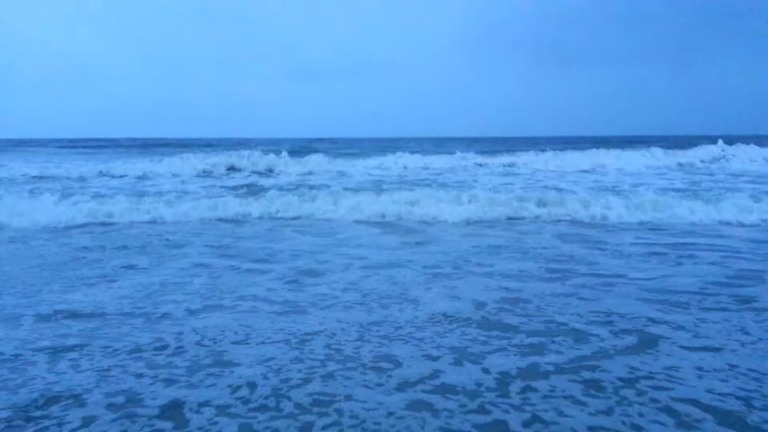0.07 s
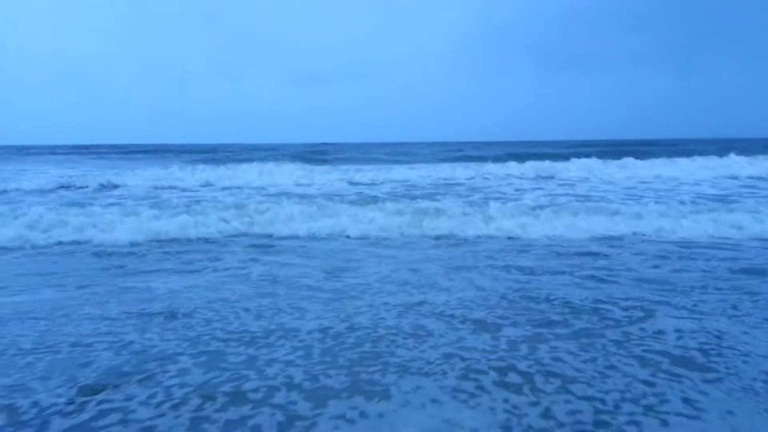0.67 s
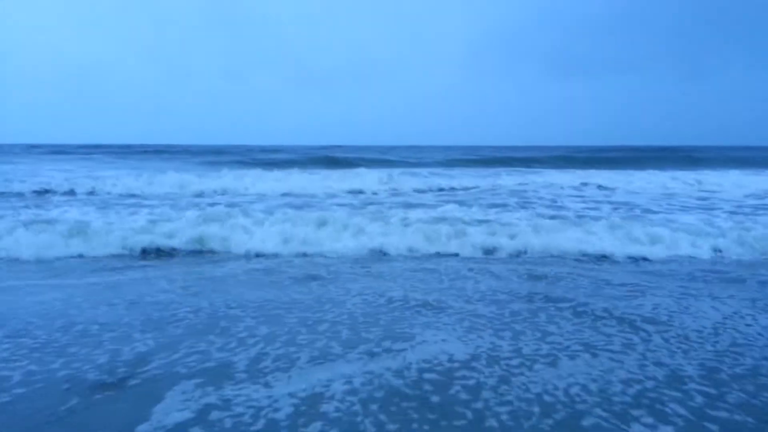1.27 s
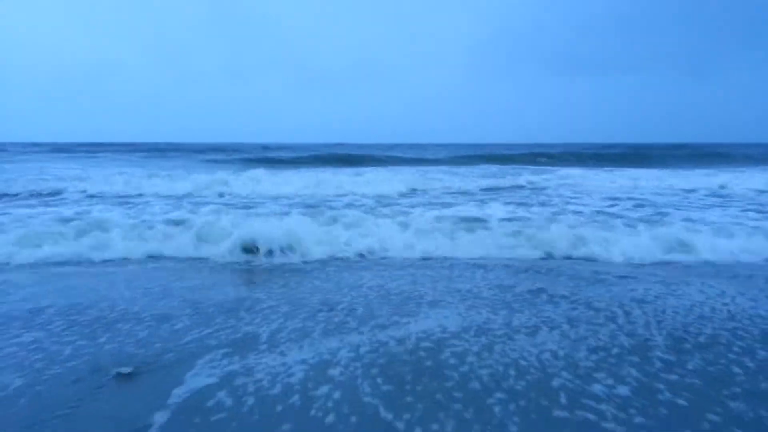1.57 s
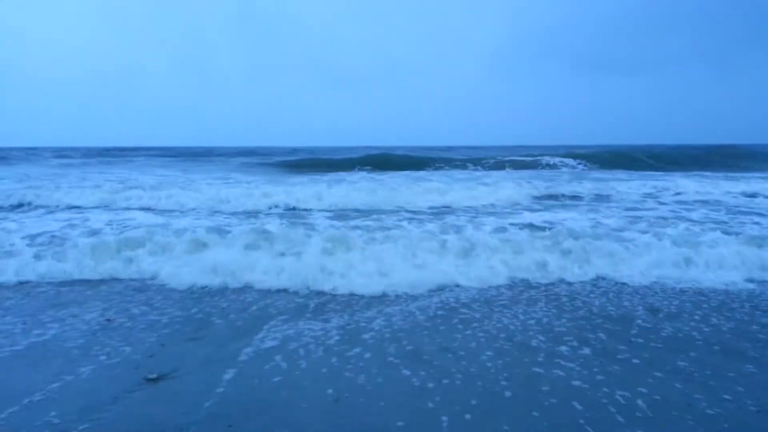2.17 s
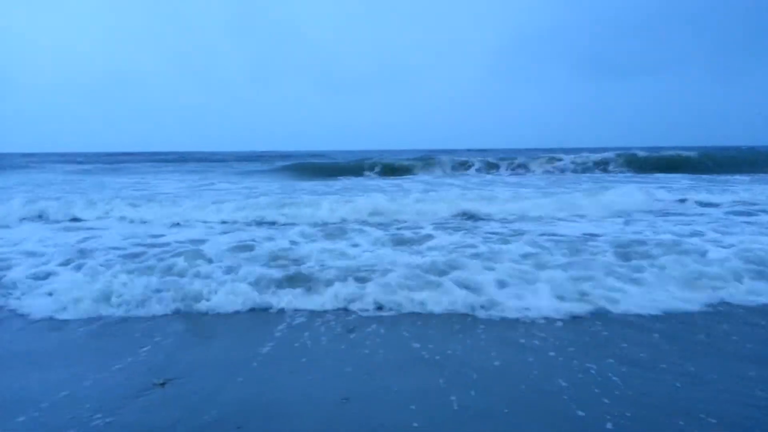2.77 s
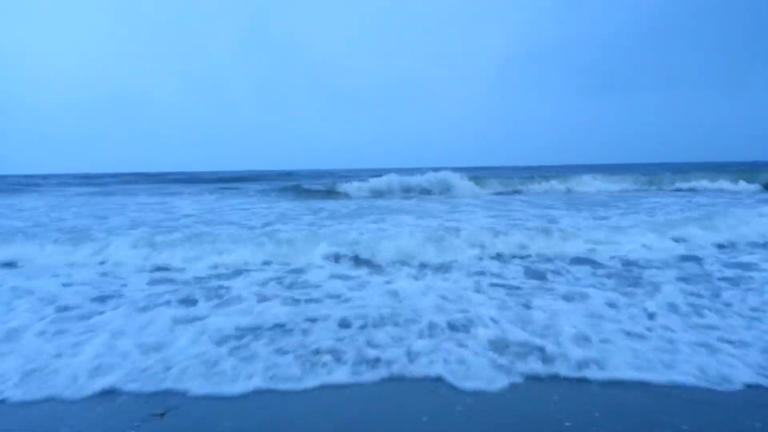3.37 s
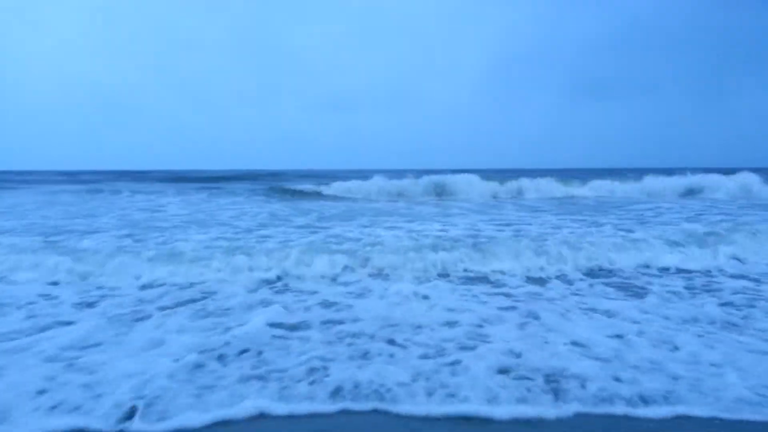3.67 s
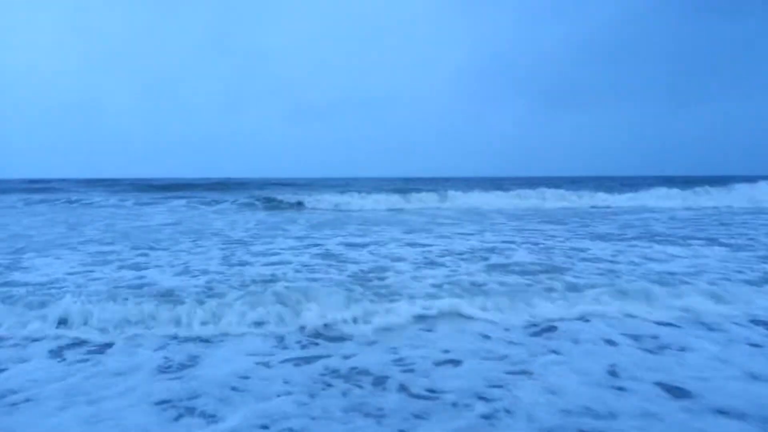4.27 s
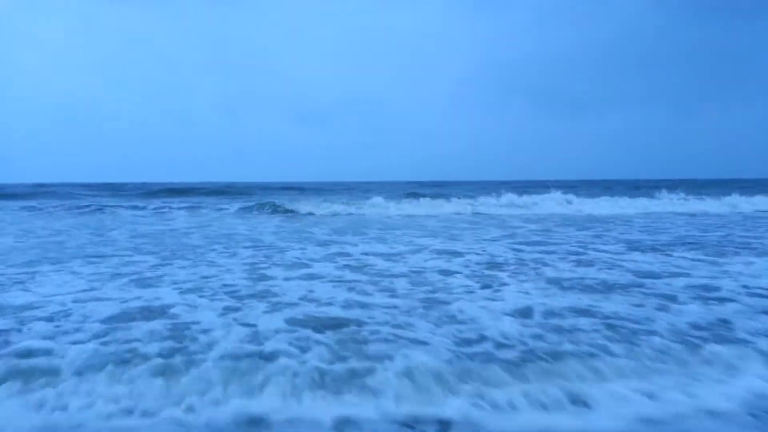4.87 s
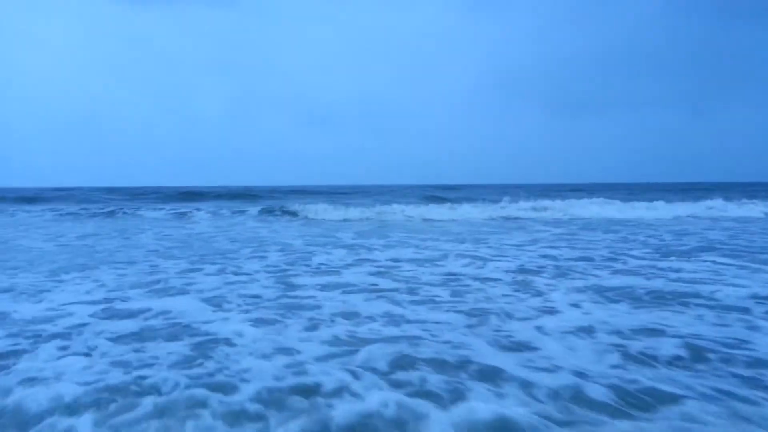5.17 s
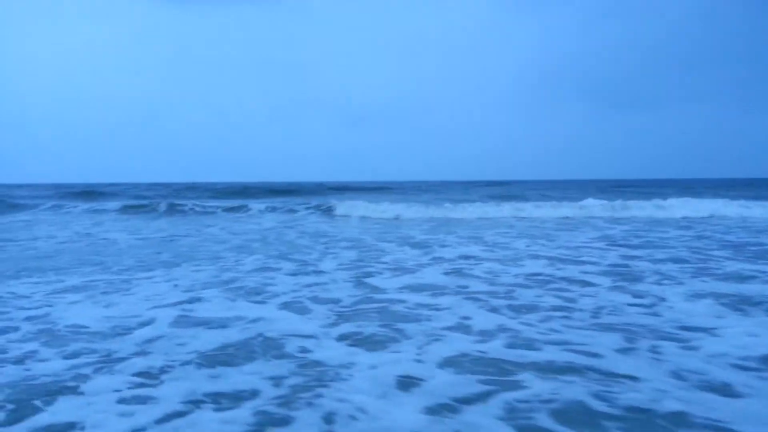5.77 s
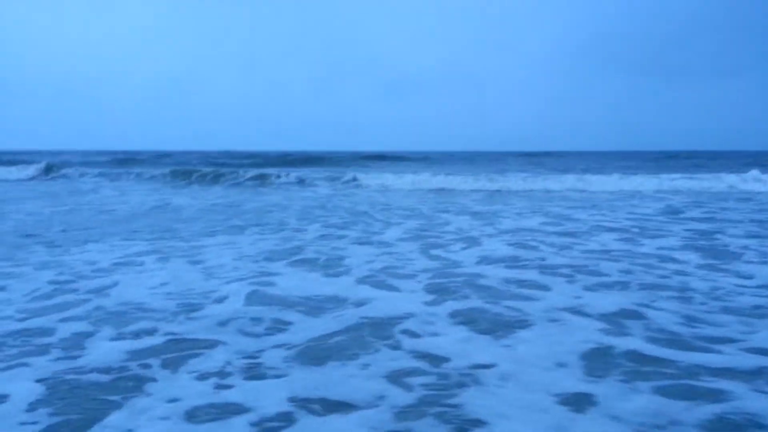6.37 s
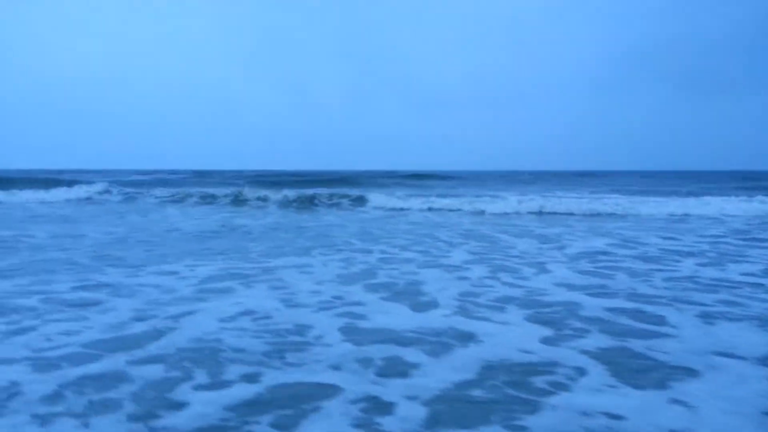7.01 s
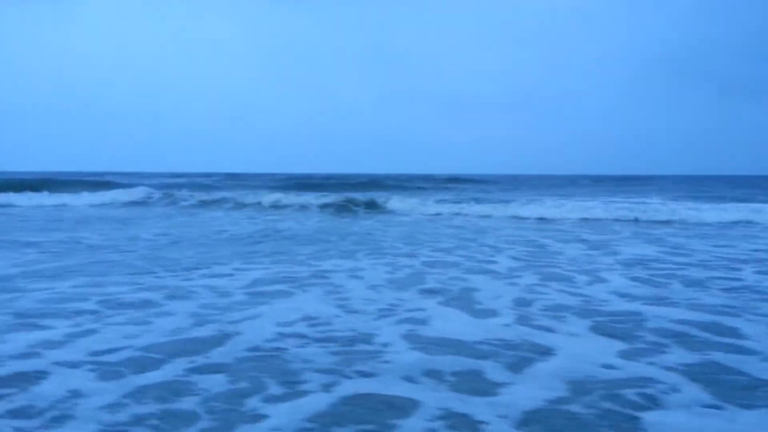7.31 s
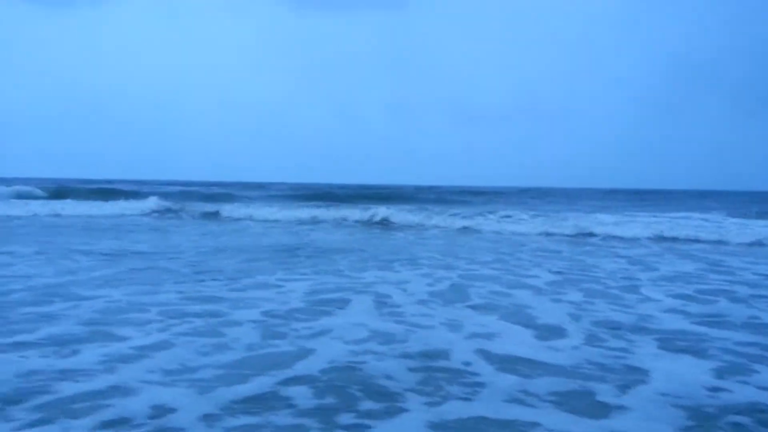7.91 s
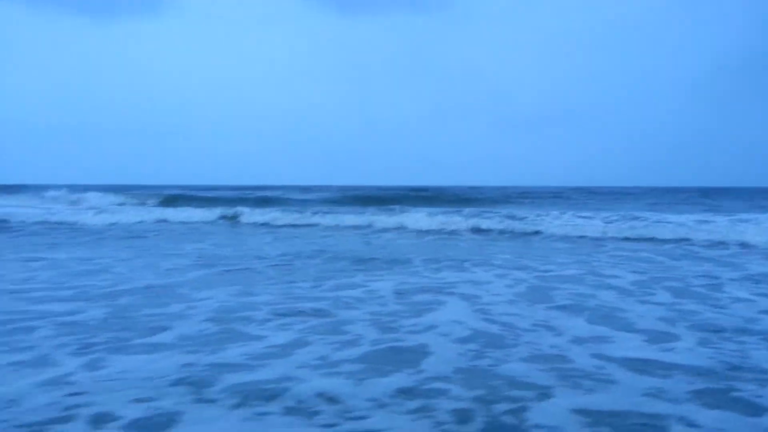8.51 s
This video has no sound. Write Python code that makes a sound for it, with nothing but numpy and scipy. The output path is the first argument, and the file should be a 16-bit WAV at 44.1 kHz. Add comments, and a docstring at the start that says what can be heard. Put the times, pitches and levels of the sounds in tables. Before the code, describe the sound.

At the water's edge on a sandy beach, surf cuts in with a deep roar and a rush of spray. The near wave peaks and dies away into fizzing foam, and gusts of wind start buffeting the microphone with low rumbles and thumps. Water bubbles, splashes and slaps lightly nearby over the steady roll of distant waves, until another breaker begins to spill over.

```python
"""The sound cuts in on a broken wave already roaring; it builds, collapses and slides up the sand.
Large bubble clouds oscillate to make the roar; small bubbles and spray make the rush and the fizz.
Splashes land close by, and turbulent gusts buffet the two ports of a microphone at the water's edge,
mostly the right one. More surf rolls behind, and near the end the next breaker swells."""
import sys
import numpy as np
from scipy import signal
from scipy.fft import rfft, irfft
from scipy.io import wavfile
from scipy.ndimage import uniform_filter1d

SR = 44100
rng = np.random.default_rng(int(sys.argv[2]) if len(sys.argv) > 2 else 0)


def dump(signal):
    """Clip the signal to [-1, 1] and save it as 16-bit WAV at the path in sys.argv[1]."""
    limited = np.clip(np.atleast_2d(signal).T, -1, 1)
    pcm = np.round(limited * 32767).astype(np.int16)
    wavfile.write(sys.argv[1], SR, pcm)


N = 381465
TIME = np.arange(N) / SR


def breakers():
    """Collective oscillation: bubble clouds roar, near and far, while spilling crests rush and spray."""
    # spectra of the close boom, its hollow roar, the far surf and the crests: f/Hz, relative level/dB
    boom_spectrum = [(60, -40), (130, -7), (260, 2), (320, -0.5), (420, -3.5), (700, -38)]
    bore_spectrum = [(100, -31), (280, -9), (385, -12), (480, 3.5), (590, 2.5), (780, -7), (960, 0.3),
                     (1300, -11.5), (2500, -30), (6000, -70)]
    far_spectrum = [(20, -38), (42, -43), (65, -21.5), (150, -2), (260, 0.3), (320, 3), (385, -3), (480, 1),
                    (590, 1.5), (780, -5), (960, -4), (1300, -10.5), (2500, -33), (6000, -68)]
    rush_spectrum = [(150, -40), (500, -7), (950, -4.5), (1400, 1.5), (1950, 1.5), (2400, -3), (3000, -9),
                     (3700, -11.5), (5000, -21), (6500, -31), (10000, -35), (16000, -60)]
    # surf further out: t/s, relative roar level/dB, relative rush level/dB
    far_levels = [(.8, -28, -29), (3.2, -27, -31), (4.4, -26.5, -31), (5.3, -28, -33), (6.2, -27, -34.5),
                  (7.0, -26, -32), (8.65, -28, -31)]
    far_roar, far_rush = amp(curves(far_levels))
    close_boom = close_wave(level_db=-29, build_db_per_s=0.5, collapse_s=1.95, dying_s=0.45)
    close_roar = close_wave(level_db=-23, build_db_per_s=3.2, collapse_s=2, dying_s=0.25)
    close_rush = close_wave(level_db=-22.5, build_db_per_s=5, collapse_s=2.26, dying_s=0.5)
    boom = bubble_noise(boom_spectrum, patch_db=2.0, frames=10, bins=5) * close_boom
    bore = bubble_noise(bore_spectrum, patch_db=1.4, frames=14, bins=4) * close_roar
    far = bubble_noise(far_spectrum, patch_db=1.0, frames=10, bins=5) * far_roar
    roar = (boom + bore + far) * amp(3.5 + 0.62 * flutter(rate_hz=30))
    rush = bubble_noise(rush_spectrum, patch_db=0.67, frames=9, bins=10)
    rush *= amp(0.5 * flutter(rate_hz=2.4))
    spray = droplets(per_s=900, spread_db=4.0, low_hz=1180, high_hz=3900, cycles=3.2)
    spray *= amp(-18.5) * amp([[-3], [2]])  # louder on the right
    crest = (rush + spray) * np.hypot(close_rush, far_rush) * amp(3.5)
    # distance takes the treble off the crests
    close_share = close_rush ** 2 / (close_rush ** 2 + far_rush ** 2)
    treble = signal.sosfiltfilt(signal.butter(2, 2900, "high", fs=SR, output="sos"), crest)
    return roar + crest + treble * (amp(-1.44 + 2.0 * close_share) - 1)


def close_wave(level_db, build_db_per_s, collapse_s, dying_s, tumble_s=1.9):
    """Amplitude envelope: the wave builds as it runs in, holds as it tumbles, then collapses."""
    # a surge each time the front topples: t/s, rise/dB, half length/s
    surges = [(1.2, 1, 0.054), (1.67, 1.5, 0.067), (2.3, 0.6, 0.072), (3.052, 2.2, 0.087)]
    surge_db = sum(rise_db * bell((TIME - s) / half_s) for s, rise_db, half_s in surges)
    build = amp(level_db + surge_db - build_db_per_s * np.maximum(tumble_s - TIME, 0))
    return build * bell(np.maximum(TIME - collapse_s, 0) / dying_s)


def foam():
    """Small bubbles resonate high: foam hisses and prickles, drifting from right to left up the sand."""
    # spectrum of the fizz: f/Hz, relative level/dB
    spectrum = [(1500, -11), (4000, 7.5), (5500, 1.3), (6600, -0.5), (8200, 0.5), (10500, -1.5),
                (13000, -3), (14600, -9.5)]
    # foam sheet around the microphone: t/s, relative level/dB, left minus right/dB
    sheet = [(.8, -51, -3), (2.3, -51, -3.5), (3.5, -49.5, -2.5), (4.0, -45.5, -1.5), (5.4, -45.2, -2),
             (6.7, -44, 1), (6.95, -42.6, 1.6), (8.65, -45, 0.5)]
    sheet_db, side_db = curves(sheet)
    close_fizz = close_wave(level_db=-41, build_db_per_s=5.5, collapse_s=2.5, dying_s=0.8)
    hiss = bubble_noise(spectrum, patch_db=1.0, frames=8, bins=14) * amp(0.64 * flutter(rate_hz=19))
    prickle = amp(-17) * droplets(per_s=700, spread_db=4.5, low_hz=4530, high_hz=13000, cycles=1.8)
    return (hiss + prickle) * np.hypot(close_fizz, amp(sheet_db)) * pan(5, side_db)


def wind(breeze_db=-36.5, rise_s=0.14, fall_s=0.1):
    """Turbulent pressure rumbles, uncorrelated at the two ports; breeze and gusts add in power."""
    # spectrum of the turbulence: f/Hz, relative level/dB
    rumble = [(15, -42), (38, -58), (65, -9.5), (110, -3.5), (160, -1), (240, 2), (330, -4), (480, -5.5),
              (750, -32), (1500, -33), (5000, -65)]
    # gusts: t/s at full strength, hold/s, right-port level/dB, left minus right/dB
    gusts = [(2.6, 0.28, -36, 1), (3.3, 0.093, -29.5, -5), (3.88, 0.83, -21, -4), (5.034, 0.13, -26, -8),
             (6.194, 0.32, -28, -10), (6.855, 0.057, -23, -8), (7.2, 0.19, -29.5, -4)]
    power = amp(breeze_db) ** 2
    for s, hold_s, level_db, side_db in gusts:
        away = np.maximum(s - TIME, 0) / rise_s + np.maximum(TIME - s - hold_s, 0) / fall_s
        power = power + (amp([[level_db + side_db], [level_db]]) * bell(away)) ** 2
    colour = amp(at_hz(rumble, np.fft.rfftfreq(N, 1 / SR)))
    out = np.zeros((2, N))
    for port, strength in enumerate(np.sqrt(power)):
        air = irfft(rfft(rng.standard_normal(N)) * colour, N)
        out[port] = unit(air * amp(1.5 * flutter(rate_hz=24))) * strength
    return out


def thumps(octave_db=-7.5):
    """Pressure pulses, steepened by a second harmonic: wind eddies, and a handling bump at 5.42 s."""
    # low thumps at the microphone: t/s, level/dB, half length/s, f/Hz, port (0 left, 1 right)
    pulses = [(3.785, -13, 0.0025, 230, 1), (3.878, -13, .005, 310, 1), (3.92, -8.5, .006, 220, 1),
              (4.187, -9, .005, 250, 1), (4.354, -6, 0.0032, 220, 0), (4.605, -6, 0.0046, 260, 1),
              (4.674, -14, 0.0036, 170, 1), (4.738, -3, 0.0027, 225, 1), (5.008, -14, .004, 280, 1),
              (5.42, -25, .015, 35, 1), (6.572, -9, .0035, 268, 1), (6.817, -15, 0.0032, 140, 1),
              (6.869, -4, 0.0052, 154, 1), (6.9, -12, 0.0024, 302, 1), (6.963, -9, .005, 326, 1),
              (7.208, -11, .003, 280, 0), (7.418, -12, 0.0063, 157, 1), (7.435, -9.5, .003, 220, 1)]
    out = np.zeros((2, N))
    for s, level_db, half_s, hz, port in pulses:
        t = np.arange(-4 * half_s, 4 * half_s, 1 / SR)
        phase = 2 * np.pi * (hz * t + rng.random())
        thump = (np.cos(phase) + amp(octave_db) * np.cos(2 * phase)) * bell(t / half_s)
        add(out[port], s + t[0], thump * amp(level_db))
    return out


def splashes():
    """Impact noise: each small splash is a band of noise that decays exponentially."""
    # splashes close by: t/s, level/dB, decay time/s, f/Hz, left minus right/dB
    impacts = [(3.94, -26, .07, 1540, -4), (4.611, -30, 0.05, 1800, 1), (5.755, -32, 0.061, 2150, -5),
               (6.89, -38, .06, 4000, 1), (6.958, -23, 0.026, 990, 0), (7.105, -34, 0.049, 2500, -1),
               (7.146, -28.5, .022, 2500, -1), (7.811, -32, .015, 2460, -7)]
    out, t = np.zeros((2, N)), np.arange(SR // 4) / SR
    for s, level_db, decay_s, hz, side_db in impacts:
        spatter = np.array([unit(band_noise(hz, octaves=0.5, count=len(t))) for port in range(2)])
        add(out, s, spatter * np.exp(-t / decay_s) * pan(level_db, side_db))
    return out


def slaps(decay_cycles=0.98, rise_s=0.00019):
    """Damped resonance: a pocket of air rings briefly in each sharp slap of water."""
    # air pockets: t/s, level/dB, f/Hz, left minus right/dB
    pockets = [(5.651, -18, 2300, 4), (6.8855, -13, 4100, 2), (6.886, -9, 7200, 2),
               (7.152, -4.5, 2850, -1.5)]
    out, t = np.zeros((2, N)), np.arange(SR // 4) / SR
    for s, level_db, hz, side_db in pockets:
        envelope = np.exp(-hz * t / decay_cycles) * (1 - np.exp(-t / rise_s))
        add(out, s, np.sin(2 * np.pi * hz * t) * envelope * pan(level_db, side_db))
    return out


def spray_ticks(decay_s=0.00016):
    """Impulse excitation: drops tick on the microphone housing, beside the left port."""
    # drops of spray: t/s, left-port level/dB, f/Hz
    drops = [(1.3156, -13, 14300), (3.563, -22, 13100), (3.6194, -20, 13600), (5.3202, -18.5, 12500),
             (6.742, -24, 13000)]
    out, t = np.zeros((2, N)), np.arange(SR // 4) / SR
    for s, level_db, hz in drops:
        ring = np.sin(2 * np.pi * hz * t) * np.exp(-t / decay_s)
        add(out, s, ring * amp([[level_db], [level_db - 12]]))
    return out


def trickle(peak_s=5.83, half_s=0.37, level_db=-39):
    """Bubble resonance: loose bubbles ring while the swash stalls at the top of its run."""
    bubbles = droplets(per_s=510, spread_db=1.5, low_hz=1920, high_hz=4160, cycles=7.7)
    return bubbles * bell((TIME - peak_s) / half_s) * amp(level_db)


def next_breaker(full_s=8.2, rise_s=1, level_db=-29):
    """Bubble noise swells in the midrange as the next wave spills over further out."""
    # spectrum of the spilling wave: f/Hz, relative level/dB
    spectrum = [(400, -24), (750, -5), (1000, -0.5), (1500, -3), (2500, -10), (5000, -50)]
    swell = bell(np.maximum(full_s - TIME, 0) / rise_s)
    return bubble_noise(spectrum, patch_db=3.0, frames=12, bins=6) * swell * amp(level_db)


def bubble_noise(spectrum, patch_db, frames, bins, size=1024, hop=256):
    """Superposition: countless bubbles sum to noise that is partly coherent at the two ports."""
    # likeness of the sea at the ports: f/Hz, coherence (clipped to 0-1)
    likeness = [(50, 0.3), (250, 1.1), (385, 0.8), (480, .93), (620, 0.66), (790, 0.45), (960, 0.66),
                (1250, 0.1), (2000, 0.5), (3000, 0.24), (4300, 0.38), (6500, 0)]
    # phase by which the left port leads: f/Hz, phase/rad
    lead = [(50, 0.8), (300, -0.4), (550, -0.23), (750, -0.4), (1000, -1), (1200, 0.2), (1700, 2),
            (2200, 1.95), (3000, 0), (4000, -2.5), (6000, -7.5)]
    # balance of the ports: f/Hz, left minus right/dB
    tilt = [(100, -1), (300, 1.5), (430, -0.5), (650, -0.2), (880, -3.5), (1100, -2.5), (1900, -7),
            (2700, -7), (3300, -4), (4200, -6), (6600, 4), (9300, -3), (12000, 4.5), (14300, 14)]
    hz = np.fft.rfftfreq(size, 1 / SR)
    draws = rng.standard_normal((5, N // hop + 5, len(hz)))
    common, separate = draws[0] + 1j * draws[1], draws[2] + 1j * draws[3]
    # patches of the spectrum, frames long and bins wide, swell and fade as the water tumbles
    patches = unit(uniform_filter1d(uniform_filter1d(draws[4], frames, axis=0), bins, axis=1))
    coherence = np.clip(at_hz(likeness, hz), 0, 1)
    lean = amp(at_hz(tilt, hz) / 2)
    left = common * np.exp(1j * at_hz(lead, hz)) * lean
    right = (coherence * common + np.sqrt(1 - coherence ** 2) * separate) / lean
    gain = amp(at_hz(spectrum, hz) + patch_db * patches) / np.hypot(lean, 1 / lean)
    spectra = np.array([left, right]) * gain
    _, sound = signal.istft(spectra.swapaxes(1, 2), nperseg=size, noverlap=size - hop)
    return unit(sound[:, :N])


def droplets(per_s, spread_db, low_hz, high_hz, cycles, pitches=24):
    """A Poisson process: bursting bubbles and falling spray ring briefly, most tiny and a few large."""
    out, t = np.zeros((2, N)), np.arange(512) / SR
    for k, hz in enumerate(np.geomspace(low_hz, high_hz, pitches)):
        hits = rng.random(N) < per_s / pitches / SR
        strength = np.minimum(rng.standard_exponential(N), 5)
        ring = np.sin(2 * np.pi * hz * t) * np.exp(-hz * t / cycles)
        out[k % 2] += signal.oaconvolve(hits * amp(spread_db * strength), ring)[:N]
    return unit(out)


def flutter(rate_hz):
    """Random modulation of unit rms, rolling off above the given rate."""
    hz = np.fft.rfftfreq(N, 1 / SR)
    response = hz / (hz + 2) / (1 + (hz / rate_hz) ** 2)
    return unit(irfft(rfft(rng.standard_normal(N)) * response, N))


def band_noise(centre_hz, octaves, count):
    """Noise in a Gaussian band of log frequency, count samples long."""
    hz = np.fft.rfftfreq(SR, 1 / SR)
    band = bell(np.log2((hz + 1) / centre_hz) / octaves)
    return irfft(rfft(rng.standard_normal(SR)) * band, SR)[:count]


def bell(x):
    """Gaussian curve of height one."""
    return np.exp(-.5 * x ** 2)


def amp(db):
    """Decibels to amplitude ratio."""
    return 10 ** (np.asarray(db) / 20)


def pan(level_db, side_db):
    """Left and right gains with a level difference of side_db."""
    return amp(level_db + side_db * np.array([[.5], [-.5]]))


def unit(x):
    """Scales to an rms of one."""
    return x / np.sqrt(np.mean(x ** 2) + 1e-20)


def at_hz(points, hz):
    """Interpolates a table on a log-frequency axis."""
    f, value = np.transpose(points)
    return np.interp(np.log(hz + 1), np.log(f + 1), value)


def curves(rows):
    """Interpolates each column of a timed table, sample by sample."""
    s, *columns = np.transpose(rows)
    return np.array([np.interp(TIME, s, column) for column in columns])


def add(mix, s, sound):
    """Superposes a sound at time s."""
    part = mix[..., round(s * SR):][..., :sound.shape[-1]]
    part += sound[..., :part.shape[-1]]


def scene():
    """Linear superposition: sea, wind and thumps add at each port."""
    sea = breakers() + next_breaker() + foam() + trickle() + splashes() + slaps() + spray_ticks()
    return sea + wind() + thumps()


def record(dry, start_s=0.815, low_hz=38, high_hz=14680, ceiling=0.96):
    """Band limiting and soft saturation: the sound switches on abruptly, its peaks rounded off."""
    highpass = signal.butter(2, low_hz, "high", fs=SR, output="sos")
    thinned = signal.sosfilt(highpass, dry) * (TIME >= start_s)
    rounded = thinned / (1 + (thinned / ceiling) ** 8) ** (1 / 8)
    lowpass = signal.firwin(1023, high_hz, window=("kaiser", 9), fs=SR)
    return signal.oaconvolve(rounded, lowpass[None], "same")


dry = scene()
out = record(dry)
dump(out)
```